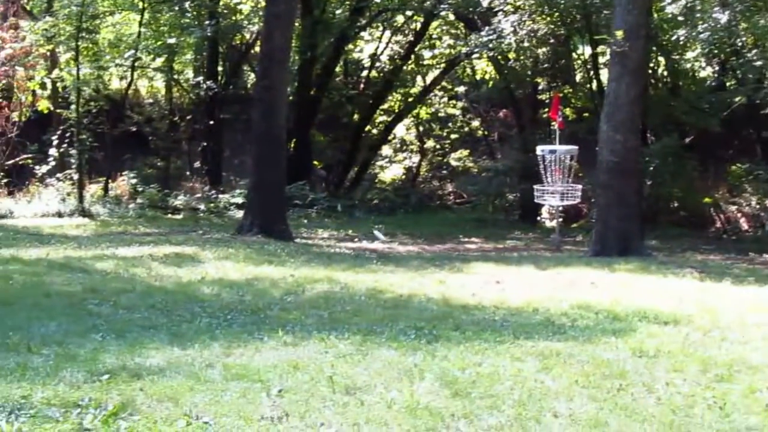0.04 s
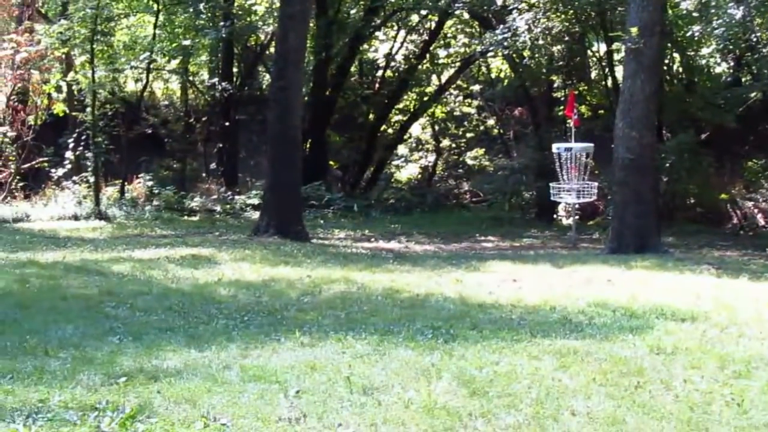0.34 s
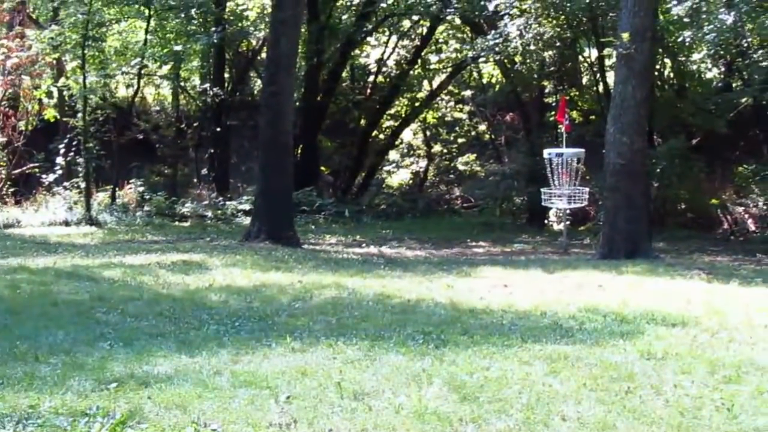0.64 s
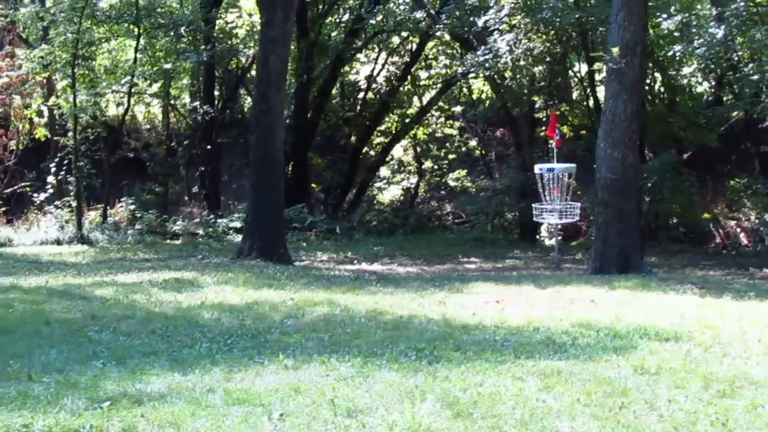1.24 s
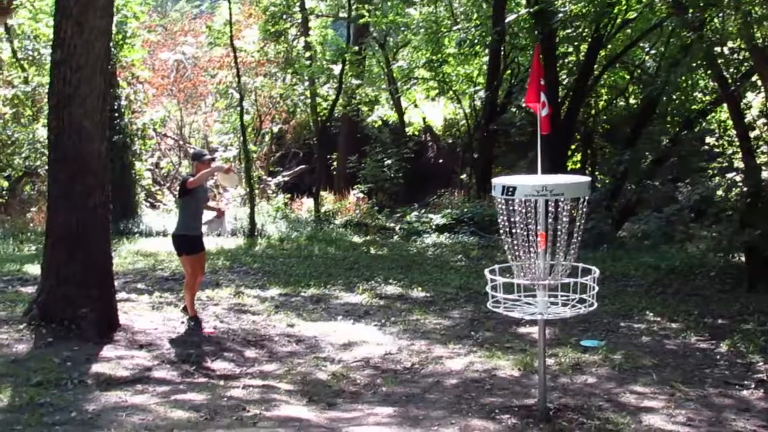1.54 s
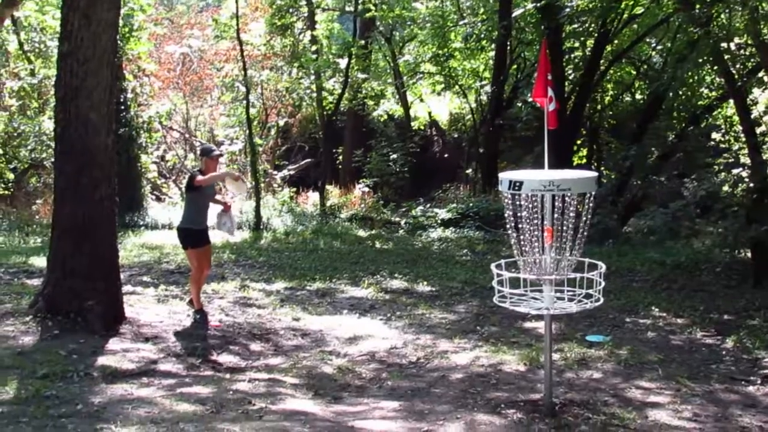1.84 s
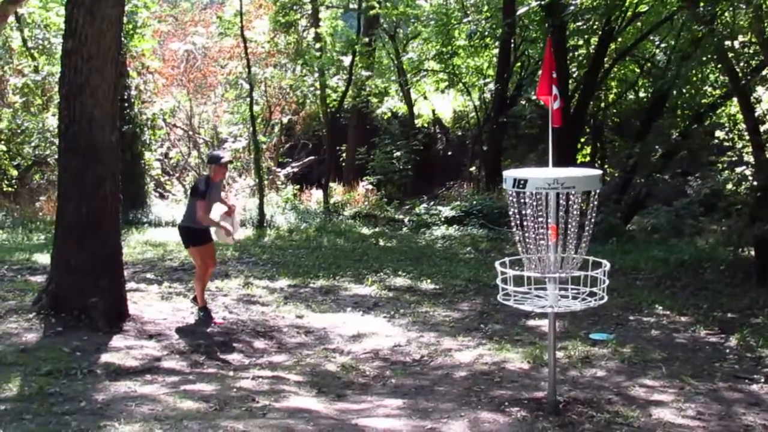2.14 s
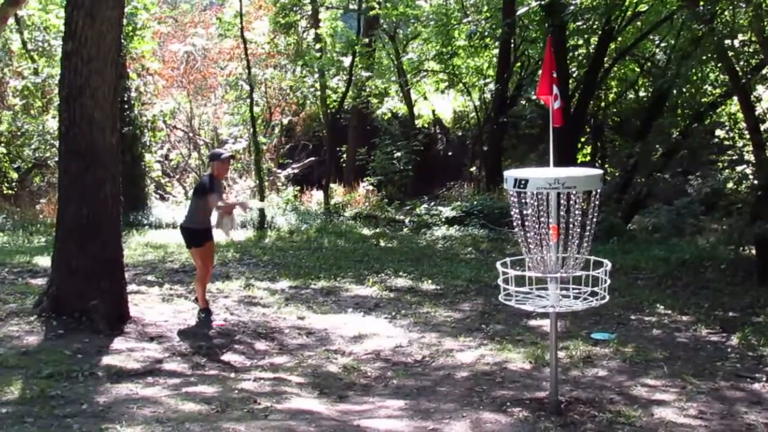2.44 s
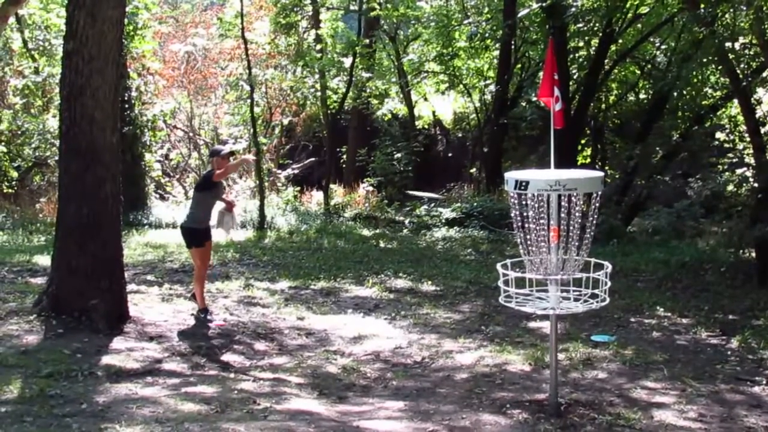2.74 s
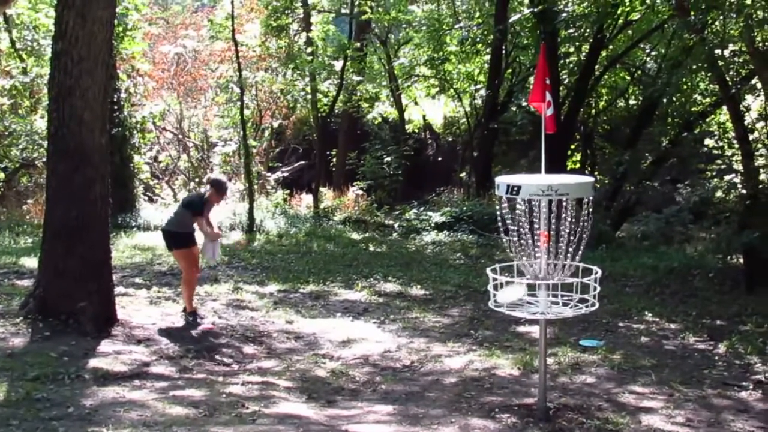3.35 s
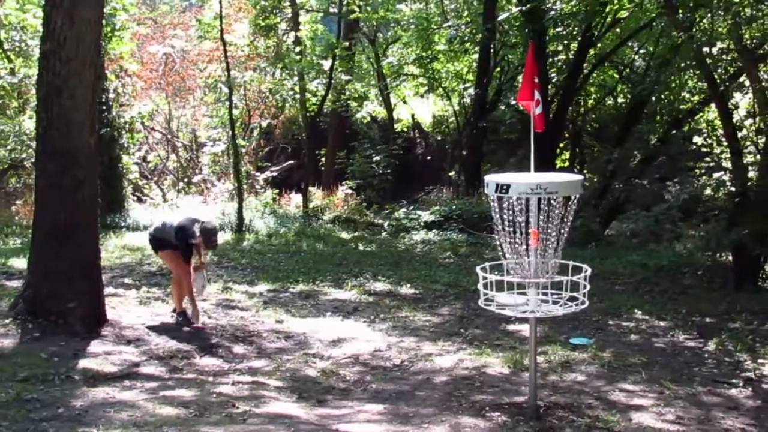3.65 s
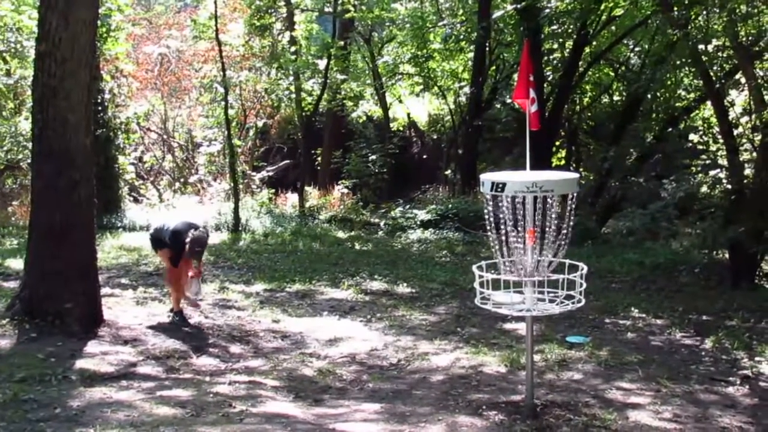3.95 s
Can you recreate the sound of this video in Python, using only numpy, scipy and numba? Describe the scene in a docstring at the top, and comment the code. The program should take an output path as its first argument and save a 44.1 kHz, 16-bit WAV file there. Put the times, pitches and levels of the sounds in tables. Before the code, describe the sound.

A disc crashes into hanging steel chains, which jingle on in a quiet park.

```python
"""Hanging steel chains, struck by a thrown disc, crash and jingle on in a basket in a wooded park.
Each impact excites the damped modes of the links; the plastic disc knocks and drops into a ringing wire
tray, and ground and trunks scatter the sound. Insects hiss over a far rumble, with faint rustles and a
chirp; this background breaks off briefly and resumes, and a thin hiss swells just before the crash.
An automatic gain control ducks after the crash and creeps back."""
import sys
import numpy as np
from scipy import signal
from scipy.fft import rfft, irfft
from scipy.io import wavfile
from scipy.ndimage import uniform_filter1d
from numba import njit

SR = 44100
rng = np.random.default_rng(int(sys.argv[2]) if len(sys.argv) > 2 else 0)


def wrap_up_sound(samples):
    """Save the sound to the file named by the first command line argument, as 16-bit audio."""
    columns = np.atleast_2d(samples).T
    # keep every value between -1 and 1, then stretch to whole-number steps
    tamed = np.clip(columns, -1, 1)
    steps = np.round(tamed * 32767).astype(np.int16)
    wavfile.write(sys.argv[1], SR, steps)


N = 176400
TIME = np.arange(N) / SR
SIDES = np.array([[1], [-1]])  # opposite signs for left and right


def undb(db):
    """Amplitude grows tenfold for every 20 dB."""
    return 10 ** (np.asarray(db) / 20)

def unit(x):
    """Normalisation to an rms of 1."""
    return x / np.sqrt(np.mean(x ** 2))

def panned(db):
    """Interaural level difference: a pair of gains with the left db above the right."""
    return undb(SIDES * db / 2)

def curve(rows, column):
    """Linear interpolation of one column of a table over time."""
    rows = np.array(rows)
    return np.interp(TIME, rows[:, 0], rows[:, column])

def on_bins(points, size=N):
    """Interpolation of a spectrum along a logarithmic frequency axis."""
    hz, value = np.array(points).T
    return np.interp(np.log(np.fft.rfftfreq(size, 1 / SR) + 1), np.log(hz), value)

def noise(spectrum, size=N):
    """Spectral shaping turns white noise into coloured noise of rms 1."""
    white = rfft(rng.standard_normal(size))
    return unit(irfft(white * undb(on_bins(spectrum, size)), size))

def flicker(rate_hz):
    """Random modulation: Gaussian values joined by straight lines, with a spread near 1."""
    knots = rng.standard_normal(1024)
    return 1.2 * np.interp(TIME * rate_hz, np.arange(len(knots)), knots)

def decay(t, t60):
    """Exponential damping: amplitude falls 60 dB in t60 seconds."""
    return np.exp(-np.log(1000) * t / t60)

def ring(pushes, hz, t60):
    """A damped harmonic oscillator answers each impulse with a decaying sine."""
    r, w = decay(1 / SR, t60), 2 * np.pi * hz / SR
    out, first = np.zeros(N), np.argmax(pushes != 0)
    feedback = [1, -2 * r * np.cos(w), r * r]
    out[first:] = signal.lfilter([0, np.sqrt(2) * r * np.sin(w)], feedback, pushes[first:])
    return out

def burst(spectrum, t60, size=16384):
    """Modal overlap: many crowded, damped modes merge into decaying noise."""
    return noise(spectrum, size) * decay(TIME[:size], t60)


# Spectra of the rumble, before and after the break, and of the insects.
# Each row: frequency in Hz, relative spectral level in dB.
EARLY_RUMBLE = [(15, -42), (25, -22), (53, -4.5), (102, 0.5), (206, -9), (322, -17.5), (362, -15),
                (553, -18.5), (607, -20), (994, -23.5), (1630, -30), (6800, -35), (8840, -64),
                (15000, -120)]
LATE_RUMBLE = [(15, -59), (25, -21), (53, 0), (97, -1), (132, -2), (221, -11.5), (354, -18.5), (593, -23),
               (805, -24.5), (1380, -28), (4350, -36), (6800, -30.5), (8840, -71), (15000, -120)]
INSECT_SPECTRUM = [(5500, -41), (6900, -21), (7700, -5), (8500, -5), (9500, -9.5), (11000, -7), (13000, -3),
                   (15000, 0), (16000, -4)]
# Background before and after the break. Each row: time in seconds, rumble in dB, insects in dB.
EARLY_LEVELS = [(0, -43, -41.5), (.45, -45.5, -41.5), (.68, -42.5, -40.5), (.8, -44.5, -41),
                (1.19, -44, -41)]
LATE_LEVELS = [(1.33, -51, -45), (1.6, -49.5, -43.5), (1.9, -47, -42), (2.45, -45.5, -39.5),
               (2.88, -45.5, -40.5), (3.299, -48.5, -44), (4, -46.5, -45)]
# Stereo width of the rumble. Each row: frequency in Hz, amplitude ratio of side to mid.
RUMBLE_WIDTH = [(50, 0.6), (120, 0.34), (260, 1.0), (1000, 1), (6000, 0.51)]

def park(rumble_spectrum, levels):
    """Low coherence between the ears makes the far rumble and the insect chorus sound wide."""
    mid = noise(rumble_spectrum)
    side = irfft(rfft(noise(rumble_spectrum)) * on_bins(RUMBLE_WIDTH), N)
    rumble = mid + SIDES * side
    rumble[1] = np.roll(rumble[1], int(.00026 * SR))  # reaches the right ear later
    insects = (noise(INSECT_SPECTRUM) + SIDES * noise(INSECT_SPECTRUM)) * panned(db=-.9)
    insect_db = curve(levels, column=2) + .5 * flicker(rate_hz=60)
    return rumble * undb(curve(levels, column=1)) + insects * undb(insect_db)


# Soft rustles. Each row: peak time in seconds, half length in seconds, level in dB.
RUSTLE_SWELLS = [(.03, 0.033, -50), (0.624, .04, -54.5), (.693, 0.039, -52.5)]
# Their spectrum. Each row: frequency in Hz, relative spectral level in dB.
RUSTLE_SPECTRUM = [(300, -11), (800, 2), (1500, -4), (3200, 1.5), (6000, 0.5), (10000, -18)]

def rustles():
    """Irregular amplitude modulation makes faint swells of noise rustle."""
    swell = sum(undb(db) * np.exp(-((TIME - at) / half) ** 2) for at, half, db in RUSTLE_SWELLS)
    envelope = swell * undb(2.5 * flicker(rate_hz=70.3))
    return envelope * np.array([noise(RUSTLE_SPECTRUM), noise(RUSTLE_SPECTRUM)])


# The band of the chirp. Each row: frequency in Hz, relative spectral level in dB.
CHIRP_SPECTRUM = [(2200, -28), (2900, 10), (4300, -13), (5200, -30)]

def chirp(peak_s=.426, half_length_s=.023, level_db=-63):
    """Narrowband noise has a blurred pitch: one short swell is a faint chirp far off in the trees."""
    swell = np.exp(-((TIME - peak_s) / half_length_s) ** 2)
    return undb(level_db) * swell * noise(CHIRP_SPECTRUM)


# Thin hiss before the crash. Each row: time in seconds, level in dB, centre frequency in Hz.
HISS_GLIDE = [(2.69, -68, 4870), (2.702, -53.5, 5220), (2.76, -49.5, 5500), (2.83, -48, 5600),
              (2.89, -45, 5680), (2.93, -70, 5500)]

def flight_hiss(width_hz=720):
    """Frequency translation: a noise band on a gliding carrier rises while the disc is in the air."""
    band = np.exp(-(np.fft.fftfreq(N, 1 / SR) / width_hz / 2) ** 2)
    carrier = np.exp(2j * np.pi * np.cumsum(curve(HISS_GLIDE, column=2)) / SR)
    basebands = np.fft.ifft(np.fft.fft(rng.standard_normal((2, N))) * band)
    mid, side = (unit((baseband * carrier).real) for baseband in basebands)
    sounding = (TIME > HISS_GLIDE[0][0]) & (TIME < HISS_GLIDE[-1][0])
    envelope = undb(curve(HISS_GLIDE, column=1)) * sounding
    return (mid + .67 * SIDES * side) * envelope * panned(db=.5)


# The disc hits chains, pole and tray. Each row: start in seconds, crack in dB, tray ring in dB.
DISC_KNOCKS = [(2.892, -24.5, -33), (2.899, -24.5, -35), (2.914, -26, -51), (2.927, -27, -49),
               (2.957, -32, -42), (2.97, -23, -47), (2.978, -39, -45), (3.024, -30, -54), (3.082, -40, -51),
               (3.108, -27.5, -48), (3.157, -37, -54), (3.197, -55, -57), (3.361, -34.5, -53),
               (3.378, -31.5, -42), (3.442, -31.5, -43), (3.491, -37.5, -55), (3.564, -41.5, -44),
               (3.588, -37, -46), (3.665, -48, -56.5), (3.958, -42.5, -54)]
# Struck plastic. Each row: frequency in Hz, relative spectral level in dB.
DISC_SPECTRUM = [(100, -23), (250, -11), (380, -5.5), (700, 0.5), (1000, 1), (1300, 1.5), (1800, 2.5),
                 (2400, 3), (3500, 1), (7000, -9.5)]
# Modes of the wire tray. Each row: frequency in Hz, relative level in dB, T60 in seconds.
TRAY_MODES = [(661, -10.5, 0.14), (896, -22.5, 1), (1033, -25, 0.43), (1285, -23, 0.23), (1472.5, -16, 1),
              (1825, -16, 1.0), (1879, -17, 0.65), (2265, -24, .4), (2410, -30, 0.28), (2733, -12, 0.39),
              (2860, -11, 0.27)]

def disc_and_tray():
    """Impact excitation: the damped plastic gives a dull crack and a shudder; the wire tray rings on."""
    out = np.zeros(N)
    start_s, crack_db, tray_db = np.array(DISC_KNOCKS).T
    onsets = (start_s * SR).astype(int)
    for at, db in zip(onsets, crack_db):
        crack = burst(DISC_SPECTRUM, t60=.063)
        shudder = undb(-17) * burst(DISC_SPECTRUM, t60=.81)
        out[at:at + len(crack)] += undb(db) * (crack + shudder)[:N - at]
    for hz, db, t60 in TRAY_MODES:
        pushes = undb(tray_db + db) * rng.choice([-1, 1], len(onsets))
        out += ring(np.bincount(onsets, pushes, N), hz, t60)
    return out


# Clashes of the swinging chains. Each row: start in seconds, length in seconds,
# then the levels in dB of the low modes, middle modes, top modes and clack.
CHAIN_CLASHES = [(2.893, .007, -55, -35, -13.5, -19), (2.899, 0.0042, -52, -16, -16.5, -20),
                 (2.911, 0.026, -41, -29, -14.5, -11), (2.939, 0.0071, -20, -12.5, -13, -14),
                 (2.95, 0.015, -28, -27, -18, -18), (2.966, .008, -10.5, -14, -6, -10.5),
                 (2.976, 0.0087, -24, -5.5, -27, -11), (2.989, .011, -43, -5.5, -9, -10.5),
                 (3.016, 0.06, -33, -21, -13, -18), (3.08, .025, -21.5, -20, -16.5, -33),
                 (3.115, 0.009, -19, -36, -16.5, -21), (3.164, 0.0071, -44, -29, -45, -28.5),
                 (3.205, 0.056, -30, -31, -24, -33), (3.289, 0.015, -53, -27, -23.5, -29),
                 (3.344, 0.023, -33, -48, -28, -43), (3.358, .014, -30.5, -59, -40, -25.5),
                 (3.431, 0.024, -40, -33.5, -31, -36), (3.482, .003, -46, -36, -26.5, -39),
                 (3.494, .014, -45, -34, -42, -32), (3.53, 0.073, -46, -51, -32, -44),
                 (3.575, 0.019, -51, -52, -34, -52), (3.64, .02, -54, -52, -38, -46),
                 (3.653, .02, -52, -43, -30, -46), (3.68, 0.044, -56.5, -49, -30, -44),
                 (3.738, .012, -54, -50, -30.5, -55), (3.76, .02, -60, -47, -33, -52),
                 (3.788, .025, -64, -59, -40, -49), (3.826, 0.0046, -53, -37, -28.5, -49),
                 (3.857, 0.0071, -37, -34, -37, -36.5), (3.906, .01, -46, -55, -37, -62),
                 (3.932, .005, -46, -33, -32.5, -41), (3.945, 0.021, -38.5, -33, -26.5, -30)]
# Three families of link modes. Each row: frequency in Hz, relative level in dB, T60 in seconds,
# spread between links as a fraction of the frequency.
LOW_MODES = [(3168, -1.5, .14, 0.0109), (3190, -21, 0.57, 0.0077), (3890, -13, 0.23, 0.0101),
             (4520, -20.5, 0.3, 0.026), (5660, -22, 0.42, 0.055)]
MIDDLE_MODES = [(8900, -6.5, 0.12, 0.0106), (9280, -5.5, .1, 0.024)]
TOP_MODES = [(10090, -4.5, 0.23, .014), (10500, -5.5, 0.076, .02), (11000, -9, 0.14, .018),
             (11640, -17, 0.13, .018), (12100, -10.5, 0.072, 0.012)]
# Steel striking steel. Each row: frequency in Hz, relative spectral level in dB.
CLACK_SPECTRUM = [(300, -22), (2000, -11.5), (2800, -9), (3500, -0.5), (6000, 1.5), (7600, -2), (9000, -2),
                  (12000, -1), (14000, -5), (16000, -15)]

def chains(links=18, soft_below_db=-22, lag_spread_s=.000012):
    """Modal superposition: links collide in turn, each ringing at its own slightly detuned pitches."""
    start_s, length_s, low_db, middle_db, top_db, clack_db = np.array(CHAIN_CLASHES).T
    order = rng.random((len(start_s), links)).argsort(1)
    turn = order + rng.random(order.shape) * (order > 0)
    delay_share = (turn / links) ** 1.3  # contacts crowd toward the start of a clash
    scatter_db = 3 + .66 * np.maximum(soft_below_db - top_db, 0)  # fewer links carry a soft clash
    force = undb(scatter_db[:, None] * rng.standard_normal(order.shape)) * (1 - delay_share / 2)
    force /= np.sqrt((force ** 2).sum(1, keepdims=True))  # the links share the energy
    out = np.zeros((2, N))
    for link in range(links):
        contact_s = start_s + length_s * delay_share[:, link]
        onsets = np.minimum((contact_s * SR).astype(int), N - 1)
        clacks = np.bincount(onsets, force[:, link] * undb(clack_db), N)
        sound = signal.oaconvolve(clacks, burst(CLACK_SPECTRUM, t60=.06))[:N]
        for family_db, modes in ((low_db, LOW_MODES), (middle_db, MIDDLE_MODES), (top_db, TOP_MODES)):
            for hz, db, t60, spread in modes:
                pushes = force[:, link] * undb(family_db + db) * rng.choice([-1, 1], len(onsets))
                detuned_hz = hz * (1 + spread * rng.standard_normal())
                sound += ring(np.bincount(onsets, pushes, N), detuned_hz, t60)
        lag = int(round(lag_spread_s * SR * rng.standard_normal()))
        right = sound[np.clip(np.arange(N) - lag, 0, N - 1)]
        out += panned(db=3 * rng.standard_normal()) * np.array([sound, right])
    return out


def trees(sound, level_db=-4, t60=.4, delay_s=.008):
    """Scattering from ground and trunks leaves a thin reverberant tail, different at each ear."""
    t = TIME[:SR]
    tail = rng.standard_normal((2, SR)) * decay(t, t60) * (t > delay_s)
    tail /= np.sqrt((tail ** 2).sum(1, keepdims=True))
    return undb(level_db) * signal.fftconvolve(sound.mean(0)[None], tail, axes=1)[:, :N]


# Direction of the basket. Each row: frequency in Hz, left minus right level in dB.
BASKET_BALANCE = [(100, -.5), (380, -2.5), (700, -7.5), (2400, -5), (3200, -9), (4500, 1), (6000, -0.5),
                  (8500, -3.5), (11000, -9), (15000, 2)]

def scene(break_s=1.1933, resume_s=1.3258):
    """Superposition: the park, broken by a short silence, and the basket a little to the right."""
    basket = irfft(rfft(chains() + disc_and_tray()) * panned(on_bins(BASKET_BALANCE)), N)
    early = park(EARLY_RUMBLE, EARLY_LEVELS) + rustles() + chirp()
    late = park(LATE_RUMBLE, LATE_LEVELS) + flight_hiss() + basket + trees(basket)
    return early * (TIME < break_s) + late * (TIME > resume_s)


@njit
def gain_reduction(wanted_db, attack_s, release_db_per_s):
    """Envelope following: the reduction rises exponentially to its target and lets go at a steady rate."""
    out, now = np.empty(len(wanted_db)), 0.
    for i, target in enumerate(wanted_db):
        if target > now:
            now += (target - now) / (attack_s * SR)
        else:
            now = max(now - release_db_per_s / SR, target)
        out[i] = now
    return out


def record(dry, threshold_db=-32.5, slope=.62, cutoff_hz=15800):
    """Compression: gain falls as the level passes a threshold; a steep low-pass then cuts the top."""
    power = uniform_filter1d((dry ** 2).mean(0), size=256)
    level_db = 10 * np.log10(np.maximum(power, 1e-12))
    wanted_db = slope * np.maximum(level_db - threshold_db, 0)
    ducked = dry * undb(-gain_reduction(wanted_db, attack_s=.036, release_db_per_s=17.5))
    lowpass = signal.ellip(12, .1, 80, cutoff_hz, fs=SR, output="sos")
    return signal.sosfilt(lowpass, ducked)


dry = scene()
out = record(dry)
wrap_up_sound(out)
```